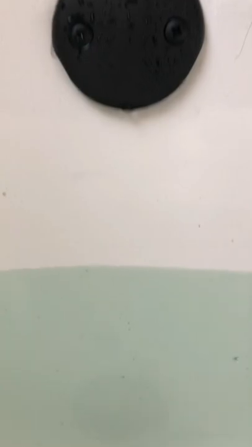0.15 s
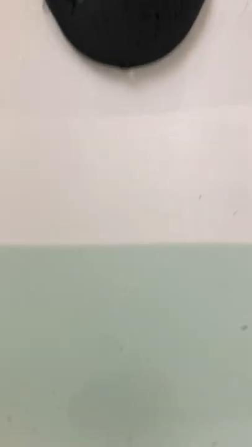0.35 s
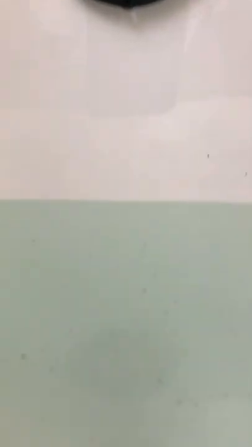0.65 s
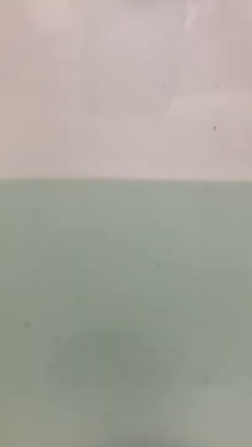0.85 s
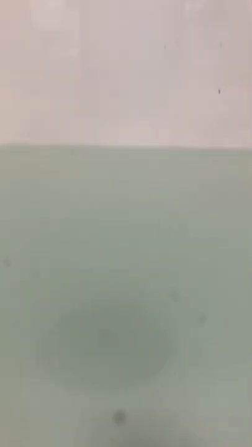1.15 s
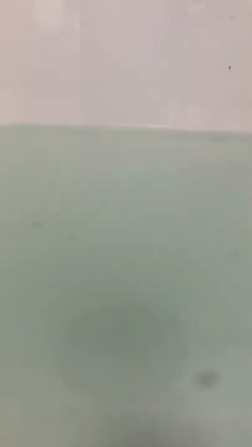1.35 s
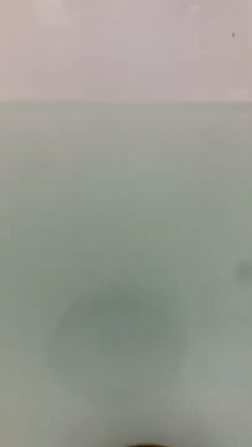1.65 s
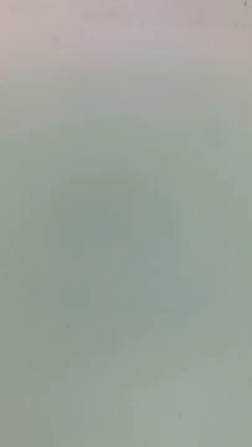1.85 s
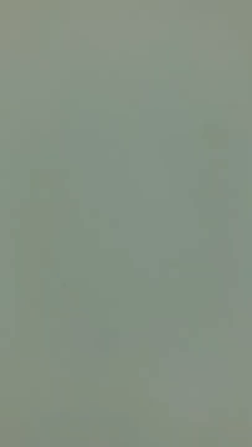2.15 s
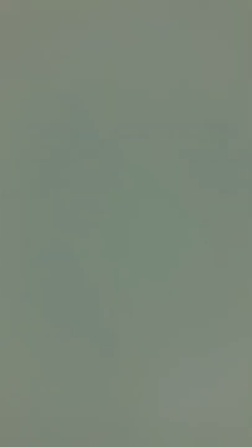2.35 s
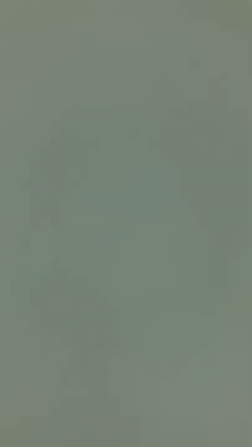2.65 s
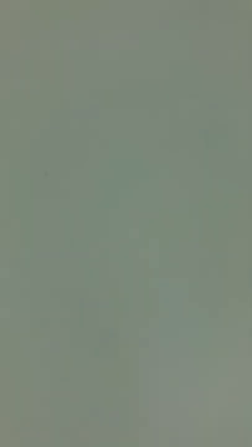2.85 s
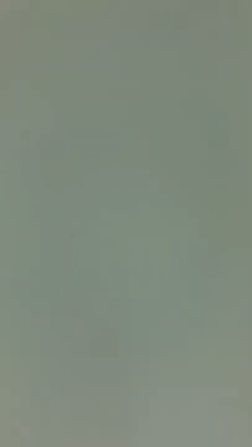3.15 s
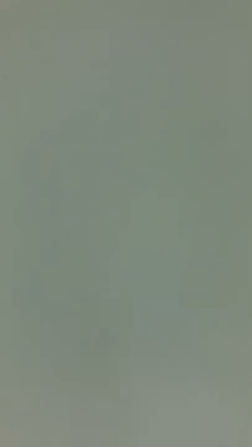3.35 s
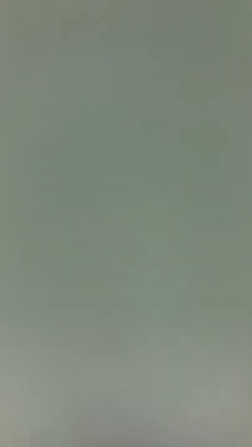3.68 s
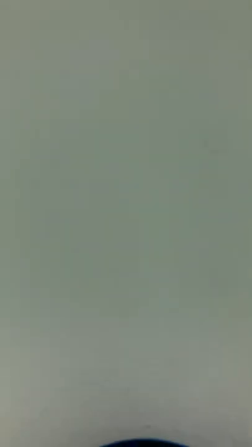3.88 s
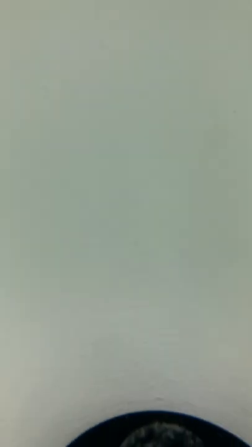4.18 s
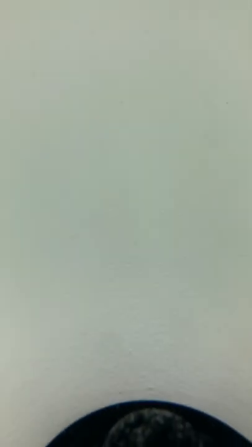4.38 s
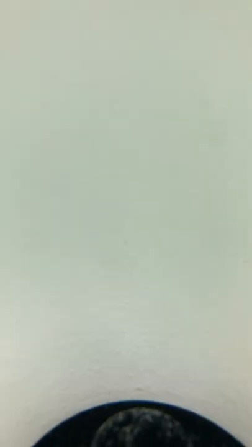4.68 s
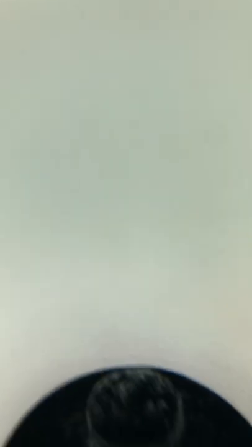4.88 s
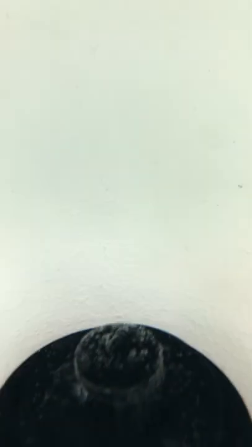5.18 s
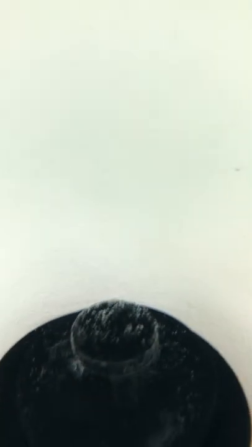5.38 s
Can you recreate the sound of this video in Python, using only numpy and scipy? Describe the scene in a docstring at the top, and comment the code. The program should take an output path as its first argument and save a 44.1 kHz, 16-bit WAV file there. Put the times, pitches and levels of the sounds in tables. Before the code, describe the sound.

Close to a filled tub in a hard-walled room, a small pump throbs about sixteen times a second, humming low with housing buzz, rattles and growing clanks. The microphone then dips under with pops and fizz; soft thumps and churning take over, nearly vanish for a second, then burst back.

```python
"""Beside a filled tub, then under its water, a small pump knocks about sixteen times a second.
In the air its knocks ring a humming tub and a rattling housing; noise hisses, loose parts clank and rattle.
Then the microphone dips: air pops, water fizzes, and soft thumps, churning and rising valve ticks take over.
For a second water seals the microphone port and all is thin and faint, then the port clears."""
import sys
import numpy as np
from scipy import signal
from scipy.fft import rfft, irfft
from scipy.io import wavfile
from scipy.ndimage import uniform_filter1d, minimum_filter1d

SR = 44100
rng = np.random.default_rng(int(sys.argv[2]) if len(sys.argv) > 2 else 0)


def generate_wav(sig):
    """Save sig (samples, or channels by samples) to the path in sys.argv[1] as 16-bit PCM at SR."""
    pcm = np.round(np.clip(np.atleast_2d(sig).T, -1, 1) * 32767).astype(np.int16)
    wavfile.write(sys.argv[1], SR, pcm)


N = 243431
T = np.arange(N) / SR   # time of each sample, s


def amp(db):
    """Gain of a level in dB."""
    return 10 ** (np.asarray(db) / 20)


def during(rows):
    """Smooth gains from a table's dB columns, silent outside its span of time."""
    start_s, *columns = np.transpose(rows)
    inside = (T >= start_s[0]) & (T <= start_s[-1])
    gate = uniform_filter1d(inside * 1., size=130)
    return [gate * amp(np.interp(T, start_s, column)) for column in columns]


def level(x, gain):
    """Bring a sound to rms 1 where the gain is open, then apply the gain."""
    return gain * x / np.sqrt(np.mean(x[gain > 0] ** 2) + 1e-20)


def low_pass(x, order, cut_hz):
    """Butterworth filter that dulls a sound above a cutoff."""
    return signal.sosfilt(signal.butter(order, cut_hz, fs=SR, output="sos"), x)


def resonate(x, modes):
    """Side-by-side resonances of (pitch_hz, width_hz, level_db), signs alternating."""
    out = 0
    for k, (hz, width, db) in enumerate(modes):
        r = np.exp(-np.pi * width / SR)   # a wider resonance loses energy faster
        feedback = [1, -2 * r * np.cos(2 * np.pi * hz / SR), r * r]
        ring = signal.lfilter([1 - r * r, 0, r * r - 1], feedback, x + 1e-18)
        out = out + (-1) ** k * amp(db) * ring
    return out


def steep(x, modes):
    """Side-by-side resonances, each applied twice so that the valleys stay dark."""
    out = 0
    for k, (hz, width, db) in enumerate(modes):
        once = resonate(x, [(hz, width, 0)])
        out = out + (-1) ** k * amp(db) * resonate(once, [(hz, width, 0)])
    return out


def colour(x, spectrum):
    """A causal (minimum-phase) filter that follows a spectrum."""
    hz, db = np.transpose(spectrum)
    grid = np.maximum(np.arange(2049) * SR / 4096, 1)
    cepstrum = irfft(np.log(amp(np.interp(np.log(grid), np.log(hz), db))))
    cepstrum[1:2048] *= 2   # fold the backward half of time onto the forward half
    cepstrum[2049:] = 0
    return signal.fftconvolve(x, irfft(np.exp(rfft(cepstrum))))[:N]


def dying(x, t60):
    """Each click starts an envelope of its height that falls 60 dB in t60 seconds."""
    return signal.lfilter([1], [1, -amp(-60 / (t60 * SR))], x + 1e-18)


def drift(rate_hz):
    """Smoothed chance of spread 1, drawn at 60 points a second."""
    knots = rng.standard_normal(int(N / SR * 60) + 2)
    slow = signal.lfilter([1], [1, -np.exp(-2 * np.pi * rate_hz / 60)], knots)
    return np.interp(T * 60, np.arange(len(slow)), slow / slow.std())


def grains(per_s, size_db):
    """Random clicks of uneven size and either sign."""
    sizes = amp(size_db * np.minimum(rng.exponential(1, N), 3.5)) * rng.choice([-1, 1], N)
    return sizes * (rng.random(N) < per_s / SR)


def chances(count, columns):
    """Bell-shaped chance values with the extremes cut off."""
    return np.clip(rng.standard_normal((count, columns)), -1.5, 1.5)


TURNS_PER_S = 15.7
# how the pump speed wanders: start_s, lead over an even run (turns)
SPEED_LEAD = [(0.0, -0.364), (0.2, -0.398), (0.45, -0.385), (1.05, -0.105), (1.2, -0.12), (1.5, -0.082),
              (1.65, -0.094), (2.1, 0.016), (2.55, -0.006), (2.95, 0.139), (3.15, 0.132), (3.35, 0.071),
              (3.65, 0.07), (3.95, 0.139), (4.35, 0.181), (4.95, 0.069), (5.15, 0.065), (5.4, 0.003)]


def pump_turns():
    """Turns the pump has made at each moment: an even run plus its wandering lead."""
    return TURNS_PER_S * T + np.interp(T, *np.transpose(SPEED_LEAD))


def contacts(stroke, jitter_s, spread_db):
    """Click trains of thumps, surges and ticks: the stroke table played once a turn."""
    turns = pump_turns()
    count = np.arange(-1, int(turns[-1]) + 1)
    trains = np.zeros((3, N))
    for share, *dbs in stroke:
        chance = chances(len(count), 3)
        at = np.interp(count + share, turns, T, left=-1, right=-1) + jitter_s * chance[:, 0]
        ok = (at > 0) & (at < T[-1])
        # thumps are nearly even; ticks vary a little less than surges
        wobbles = [0.084 * chance[:, 1], chance[:, 1], 0.7 * chance[:, 2]]
        for train, db, wobble in zip(trains, dbs, wobbles):
            train[(at[ok] * SR).astype(int)] += amp(db + spread_db * wobble[ok])
    return trains


MIC_HISS_DB, MIC_HISS_CUT_HZ = -72.5, 11000   # noise level before the cut


def microphone_hiss():
    """The microphone's own steady noise, dulled at the top."""
    return amp(MIC_HISS_DB) * low_pass(rng.standard_normal(N), 2, MIC_HISS_CUT_HZ)


# tub resonances heard in the air: pitch_hz, width_hz (of each of two passes), level_db
AIR_TUB_MODES = [(48, 7.2, -21), (82.6, 19, -7), (103, 8, -63), (132.8, 14.3, 6), (186, 7.7, -14.5),
                 (224.6, 29, -20.5), (291, 7.2, -13.5)]


def tub_hum(thump):
    """The pump's thumps ring the tub."""
    lead_in = round(4 * SR / TURNS_PER_S)   # the tub is already humming
    return steep(np.r_[thump[:lead_in], thump], AIR_TUB_MODES)[lead_in:]


# pump housing resonances: pitch_hz, width_hz (the buzz and the clanks widen it),
# level_db (for the buzz; clanks and rattles set their own)
HOUSING_MODES = [(396, 10, -12), (586, 13.5, -1), (815.6, 34.4, 3.5), (1100, 15.6, 4), (1410, 42, -3.5),
                 (2203, 47, -16), (3320, 6.1, -46), (3450, 81, -14), (4740, 57, -25.5), (6270, 210, -21),
                 (7940, 33, -25), (8880, 530, -22), (11040, 15, -30), (11800, 57, -31)]


def housing_buzz(shake):
    """Small random knocks, stronger after each push, ring the lower housing modes."""
    knocks = grains(per_s=1200, size_db=6)
    return steep(knocks * shake, [(hz, 1.6 * width, db) for hz, width, db in HOUSING_MODES if hz < 5000])


# colour of the noise in the air: pitch_hz, level_db (per Hz)
AIR_HISS_COLOUR = [(150, -31), (250, 11), (360, 7.5), (816, 3), (955, -0.5), (1100, 3), (1280, -0.5),
                   (3520, -36.5), (4410, -39), (9330, -40), (16000, -84)]


def air_spray(shake):
    """Coloured noise that pulses with the shaking."""
    return colour(rng.standard_normal(N) * shake, AIR_HISS_COLOUR)


def patchy(x, patchy_db):
    """Treble bands that swell and sink each on their own."""
    edges = np.geomspace(2800, 17000, num=13)
    out = 0
    for edge in zip(edges, edges[1:]):
        band = signal.sosfilt(signal.butter(2, edge, "band", fs=SR, output="sos"), x)
        out = out + amp(patchy_db * drift(54.0)) * band
    return out


def rattle(x, t, hz, t60):
    """Noise round the centre pitch, in two chance bands of the treble, and in the upper housing modes."""
    x = x * amp(-60 * t / t60)
    chance = rng.uniform(0, 1, (2, 2))
    bands = [(hz, .5 * hz, 0)] + [(5500 + 8000 * a, 2500, -3 - 10 * b) for a, b in chance]
    broad = 0
    for f, width, db in bands:
        once = resonate(x, [(f, width, 0)])
        broad = broad + amp(db - 10.0) * resonate(once, [(f, width, 0)])
    # modes far from the centre pitch answer more weakly
    modes = [(f, width, 2.5 - 10 * abs(np.log2(f / hz))) for f, width, _ in HOUSING_MODES if f > 3000]
    return broad + resonate(x, modes)


def clank(x, t, hz, t60):
    """A clear ring at its own pitch; the blow also stirs the housing modes nearby."""
    ring = np.sin(2 * np.pi * hz * t) * amp(-60 * t / t60) * (1 - np.exp(-t / 0.0016))
    modes = [(f, 11.7 * width, -8 * abs(np.log2(f / hz))) for f, width, _ in HOUSING_MODES if f < 3000]
    body = steep(x * np.exp(-t / 0.0044), modes)
    return ring + amp(-3.0) * body / np.abs(body).max()


def bursts(events, sound, attack_s):
    """Short noise bursts, each shaped by the given sound and set to its peak level."""
    out, t = np.zeros(N + SR), T[:SR // 4]
    for s, db, hz, t60 in events:
        burst = sound(rng.standard_normal(len(t)) * (1 - np.exp(-t / attack_s)), t, hz, t60)
        start = int(s * SR)
        out[start:start + len(t)] += amp(db) * burst / np.abs(burst).max()
    return out[:N]


SHAKE_SHARES, SHAKE_SCATTER = [.44, .76], .05   # moments in the turn and their scatter, in turns


def shaken(modes, peak_db, spread_db, t60):
    """Two small blows a turn in the air, each on a chance housing mode; weak modes sound weaker."""
    turns = pump_turns()
    whole_turns = np.arange(int(np.interp(AIR_LEVELS[-1][0], T, turns)))
    due = np.add.outer(whole_turns, SHAKE_SHARES).ravel()
    late, strength = chances(len(due), 2).T
    hz, _, mode_db = rng.choice(modes, len(due)).T
    at = np.interp(due + SHAKE_SCATTER * late, turns, T)
    db = peak_db + spread_db * strength + 0.54 * (mode_db - mode_db.max())
    return list(zip(at, db, hz, t60 + 0 * at))


ROOM_T60_S, ROOM_DB = 0.28, -10.5


def room(x):
    """A tail of dying noise from the hard walls."""
    t = T[:SR // 2]
    tail = rng.standard_normal(len(t)) * amp(-60 * t / ROOM_T60_S) * (t > .004)
    return x + amp(ROOM_DB) * signal.fftconvolve(x, tail / np.sqrt(np.sum(tail ** 2)))[:N]


# the loudest bright rattles of loose parts: start_s, peak_db, centre_hz, t60_s (time to fall 60 dB)
LOUD_RATTLES = [(0.0573, -11, 9100, 0.024), (0.177, -22, 3240, 0.23), (0.3222, -17.5, 3700, 0.032),
                (0.4968, -17.5, 4000, 0.026), (0.6253, -26, 3450, 0.055), (0.8066, -20.5, 4740, 0.054),
                (0.8624, -25, 6250, 0.035), (0.928, -30, 6200, 0.54), (1.0555, -23, 12400, 0.12),
                (1.1846, -13.5, 6660, 0.047), (1.305, -25.5, 8650, 0.2), (1.4186, -13.5, 3170, 0.073),
                (1.5444, -26.5, 3020, 0.11), (1.797, -26, 5260, 0.082), (1.83, -14, 3850, 0.03),
                (1.9954, -16, 9300, 0.081)]
# the loudest pitched plops and clanks: start_s, peak_db, pitch_hz, t60_s
LOUD_CLANKS = [(0.372, -19, 583, 0.12), (0.599, -16, 794, 0.067), (0.851, -21.5, 1122, 0.22),
               (0.985, -14.5, 1100, 0.11), (1.031, -16.5, 1100, 0.1), (1.161, -8, 783, 0.049),
               (1.181, -14, 1100, 0.17), (1.304, -4.5, 358.5, 0.16), (1.306, -11, 2140, 0.053),
               (1.37, -9, 1410, 0.068), (1.421, -5.5, 411, 0.11), (1.447, -15.5, 2220, 0.043),
               (1.555, -12.5, 830, 0.027), (1.581, -12.5, 1050, 0.13), (1.625, -8, 1090, 0.024),
               (1.672, -13, 2660, 0.024), (1.832, -6, 475, 0.085), (1.897, -16.5, 1084, 0.19),
               (1.998, -16, 1400, 0.059)]
NEARING_DB_PER_S = 5.5   # the small clanks grow as the microphone nears the water


def loose_parts():
    """Rattles, plops and clanks, large and small, with the room's tail."""
    low = [mode for mode in HOUSING_MODES if mode[0] < 3000]
    high = [mode for mode in HOUSING_MODES if mode[0] > 3000]
    small = shaken(low, peak_db=-24, spread_db=4.0, t60=.08)
    clanks = LOUD_CLANKS + [(s, db + NEARING_DB_PER_S * s, hz, t60) for s, db, hz, t60 in small]
    rattles = LOUD_RATTLES + shaken(high, peak_db=-30, spread_db=4.0, t60=.05)
    return room(bursts(clanks, clank, attack_s=0.0011) + bursts(rattles, rattle, attack_s=0.0012))


# levels in the air, nearing the water: start_s, hum_db, housing_db (before a trim per layer), hiss_db
AIR_LEVELS = [(0.0, -15.5, -28.5, -35), (0.44, -18.5, -31.5, -48), (0.55, -17.5, -29.5, -45.5),
              (1.0, -15, -27, -53.5), (1.15, -16, -30, -50), (1.35, -13.5, -25, -55),
              (1.5, -17.5, -23, -66), (1.91, -16, -25, -30), (1.97, -27.5, -26.5, -37),
              (2.04, -19.5, -24, -28.5)]
# the one push a turn that reaches the air: share of turn, thump_db, shake_db, tick_db (ticks not played)
AIR_PUSH = [(0.74, 0, -8.5, 0)]


def pump_in_air():
    """Each push hums in the tub and shakes the housing, which buzzes, hisses and rattles."""
    hum_gain, housing_gain, hiss_gain = during(AIR_LEVELS)
    thump, surge, _ = contacts(AIR_PUSH, jitter_s=0.00076, spread_db=11.0)
    shake = amp(-8.5) + dying(surge, 0.32)   # a steady part plus each dying push
    spray = air_spray(shake)
    out = level(tub_hum(thump), hum_gain)
    out = out + level(housing_buzz(shake), housing_gain * amp(-6.5))
    out = out + level(low_pass(spray, 2, 3000), housing_gain * amp(-5.5))
    out = out + level(patchy(spray, patchy_db=5.5), hiss_gain)
    return out + loose_parts() * (hum_gain > 0)


# trapped air pops at the port: start_s, level_db (of the ring), start_hz, final_hz, t60_s
AIR_POPS = [(2.041, 0, 2000, 750, .015), (2.057, -8, 1500, 1430, .12), (2.188, 0, 1700, 750, .016),
            (3.157, -18, 1500, 1050, .025), (4.071, 4, 1200, 330, .03), (4.094, 2, 900, 400, .03),
            (4.236, -3, 900, 450, .025), (4.308, 0, 500, 220, .04), (4.445, -8, 600, 280, .03),
            (4.716, -3, 1500, 350, .025), (4.995, 5, 1500, 280, .045), (5.14, 4, 1300, 250, .045)]
POP_FALL_S = .0025   # time of the fall in pitch


def pops():
    """A bubble at the port: a ring that falls to its final pitch."""
    out, t = np.zeros(N + SR), T[:SR // 8]
    for s, db, start_hz, hz, t60 in AIR_POPS:
        cycles = hz * t + (start_hz - hz) * POP_FALL_S * (1 - np.exp(-t / POP_FALL_S))
        attack = 1 - np.exp(-(t / .0005) ** 2)
        ring = np.sin(2 * np.pi * cycles) * amp(-60 * t / t60) * attack
        start = int(s * SR)
        out[start:start + len(t)] += amp(db) * ring
    return out[:N]


# water bursts off the port and fizzes out: start_s, level_db (at the start), t60_s
WATER_SPLASHES = [(2.042, -31.5, 0.57), (4.054, -32, .03), (4.07, -19.5, 0.12), (4.715, -26, 0.025)]
# colour of the fizz: pitch_hz, level_db (per Hz)
SPLASH_COLOUR = [(300, 8), (1400, -5), (2500, -2), (5000, -22), (9000, -27), (13000, -60.5)]


def splashes():
    """Fine crackle under envelopes that die away."""
    envelope = 0
    for s, db, t60 in WATER_SPLASHES:
        envelope = envelope + amp(db - 60 * np.maximum(T - s, 0) / t60) * (T >= s)
    fizz = colour(grains(per_s=6000, size_db=0.84), SPLASH_COLOUR)
    return envelope * fizz / fizz.std()


# tub and water resonances, one list a stage: pitch_hz, width_hz (of each of two passes), level_db
WATER_TUB_MODES = [
    [(52.6, 11.3, 4.5), (100, 15.6, 3), (156.7, 64, 5), (234, 20, 3.5), (467, 430, -4.5), (764, 400, -51)],
    [(51, 13, 7), (101, 96, 10), (184, 48, 11), (236, 31, 8), (344, 48, 6), (1200, 460, 17.5)],
    [(51, 23, -7.5), (101, 11, 3), (163, 44, 3.5), (246.7, 21, 2.5), (320, 130, -8.5), (607, 380, -17.5)],
]


def tub_thumps(thump, stage):
    """Soft blows ring the tub and its water."""
    return steep(dying(thump, t60=0.0044), WATER_TUB_MODES[stage])


# colour of the churning, one list a stage: pitch_hz, level_db (per Hz)
CHURN_COLOUR = [
    [(160, -23.5), (270, -3.5), (500, 0), (743, -0.5), (1010, -11.5), (1240, -14.5), (1440, -8),
     (1850, -26.5), (3180, -35), (4200, -41.5), (6330, -61), (9000, -65.5), (11700, -105), (19800, -120)],
    [(150, -26), (250, -18.5), (353, 1), (410, -10), (653, -10), (1230, -2), (2040, -30.5), (2790, -33.5),
     (3890, -48), (6470, -34.5), (9000, -56.5), (11700, -69), (19800, -120)],
    [(47, -24.5), (80, -13), (160, -10.5), (313, -6.5), (437, -11), (651, -11), (803, -23.5), (949, -26.5),
     (1270, -27), (1900, -45), (3140, -52), (4120, -58), (12000, -82.5), (15600, -108), (22000, -120)],
]
INRUSH_DB, INRUSH_T60_S = -4, 1   # rush of water that is strongest as a stage begins and dies away


def churning(surge, start_s, between_db, per_s, stage):
    """Random grains of water noise that surge at each contact."""
    swell = dying(dying(surge, 0.01), 0.02) / 70   # a surge swells for a few ms and dies
    inrush = amp(INRUSH_DB - 60 * np.abs(T - start_s) / INRUSH_T60_S)
    flow = (amp(between_db) + inrush + swell) * amp(1.5 * drift(20))
    return colour(grains(per_s, size_db=3.07) * flow, CHURN_COLOUR[stage])


# an air pocket at the port, one row a stage: pitch_hz, width_hz (of each of two passes),
# level_db (against the churning)
AIR_POCKET = [(1400, 200, -22), (1220, 560, -19.5), (1290, 310, -27.5)]
MURMUR_CUT_HZ = 1750


def pocket_murmur(churn_gain, stage):
    """Uneven grains ring an air pocket, which murmurs between the surges."""
    hz, width, db = AIR_POCKET[stage]
    murmur = steep(grains(per_s=2000, size_db=5) * amp(5 * drift(24)), [(hz, width, 0)])
    return level(low_pass(murmur, 6, MURMUR_CUT_HZ), churn_gain * amp(db))


# a tick is a tiny rising ring, one row a stage: start_hz and rise (share per ms), both before chance
# varies them, length_s, upper_db (upper partials)
VALVE_TICKS = [(2900, .14, .0028, -20), (2900, .06, .0035, -6), (2950, .03, .0042, -21)]
TICK_CUT_HZ = 5800


def valve_ticks(train, stage):
    """The clicks are dealt to eight short rising rings of different pitch, each a little rough."""
    hz, rise, length_s, upper_db = VALVE_TICKS[stage]
    t, dealt, out = T[:int(length_s * SR)], rng.integers(0, 8, N), 0
    shape = np.sin(np.pi * np.sqrt(t / length_s)) ** 2   # quick swell, slower fall
    for k, (tune, bend) in enumerate(rng.uniform(-1.72, 1, (8, 2))):
        bent_time = t + 500 * rise * (1 + .6 * bend) * t * t
        phase = 2 * np.pi * hz * (1 + .08 * tune) * bent_time
        ring = np.sin(phase) + amp(upper_db) * (np.sin(2.1 * phase) + 1.5 * np.sin(1.5 * phase))
        rough = 1 + 0.24 * uniform_filter1d(rng.standard_normal(len(t)), size=12)
        tick = ring * rough * shape / np.std(ring * rough * shape)
        out = out + signal.fftconvolve(train * (dealt == k), tick)[:N]
    return low_pass(out, 6, TICK_CUT_HZ)


# port open, sealed, open again, one list a stage: start_s, thump_db, churn_db, tick_db
WATER_LEVELS = [
    [(2.045, -14, -24, -49), (2.12, -18, -16.5, -31), (2.3, -9, -13.5, -28.5), (3.11, -11, -14.5, -30),
     (3.14, -13, -46, -54)],
    [(3.14, -55, -32.5, -58), (3.18, -45.5, -35, -56.5), (4.0, -35.5, -30, -58.5), (4.068, -29, -25.5, -45)],
    [(4.07, -23, -6, -38), (4.15, -42, -7.5, -37.5), (4.3, -13.5, -11, -38.5), (4.55, -17, -13.5, -40),
     (5.52, -19, -16, -42.5)],
]
# contacts in each turn: share of turn, thump_db, surge_db, tick_db
WATER_STROKE = [(.45, 7.5, 0.5, 3), (.482, -36.5, 11, -7.5), (.718, -45, 15, -4.5), (.75, -1, -21, -10.5),
                (.778, -19, 5.5, -6), (.83, -29, 2, -4.5), (0.0319, -20.5, -3, -42)]
# one row a stage: between_db (churning between surges), grains per s, spread_db (contact strength)
STAGE_SETTINGS = [(-5.5, 5900, 5), (-6, 3300, 5), (0, 3700, 7)]


def pump_in_water():
    """Each stage: thumps in the tub, churning, a murmuring air pocket and valve ticks."""
    out = 0
    for stage, (rows, settings) in enumerate(zip(WATER_LEVELS, STAGE_SETTINGS)):
        between_db, per_s, spread_db = settings
        thump_gain, churn_gain, tick_gain = during(rows)
        thump, surge, tick = contacts(WATER_STROKE, jitter_s=0.00034, spread_db=spread_db)
        water = churning(surge, rows[0][0], between_db, per_s, stage)
        out = out + level(tub_thumps(thump, stage), thump_gain)
        out = out + pocket_murmur(churn_gain, stage)
        out = out + level(water, churn_gain)
        out = out + level(valve_ticks(tick, stage), tick_gain)
    return out


def scene():
    """Pump through air, then through water, over the microphone's own hiss."""
    return (microphone_hiss() + pump_in_air() + pops() + splashes() + pump_in_water())[None]


CUTOFF_HZ = 16500


def record(dry):
    """A look-ahead limiter holds peaks under full scale, then the top is cut."""
    room_left = np.minimum(.93 / (np.abs(dry) + 1e-9), 1)
    gain = uniform_filter1d(minimum_filter1d(room_left, size=201), size=201)
    return signal.sosfilt(signal.cheby2(12, 50, CUTOFF_HZ, fs=SR, output="sos"), gain * dry)


dry = scene()
out = record(dry)
generate_wav(out)
```